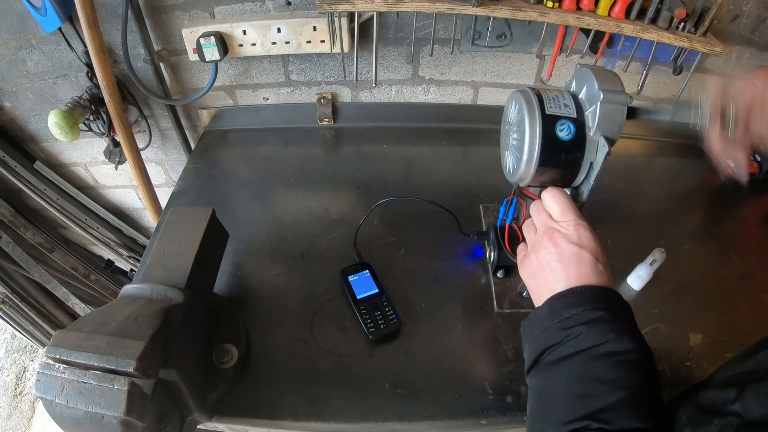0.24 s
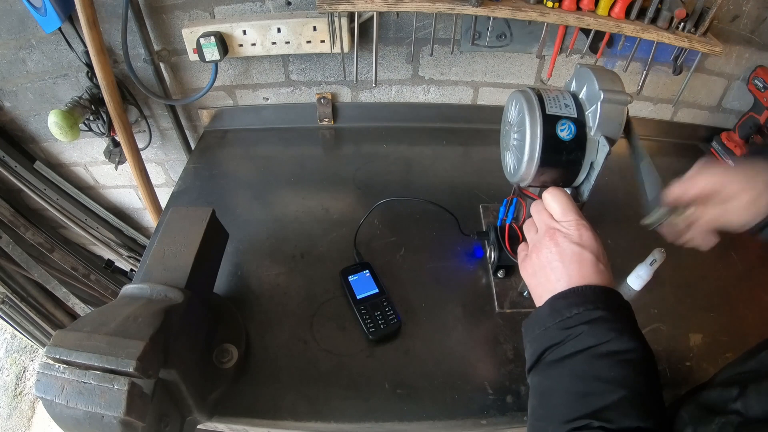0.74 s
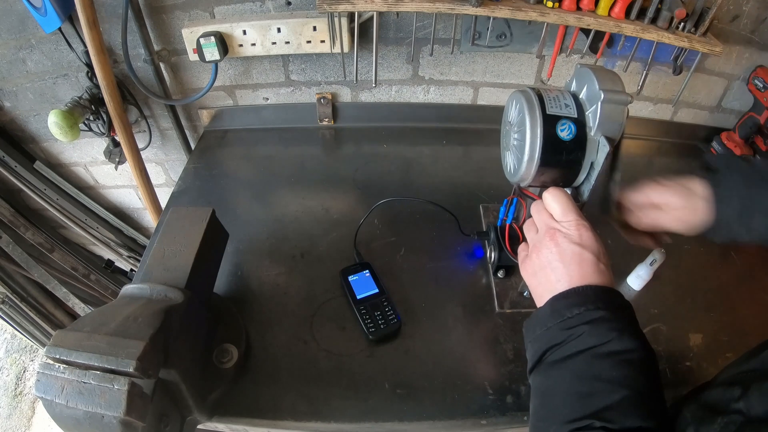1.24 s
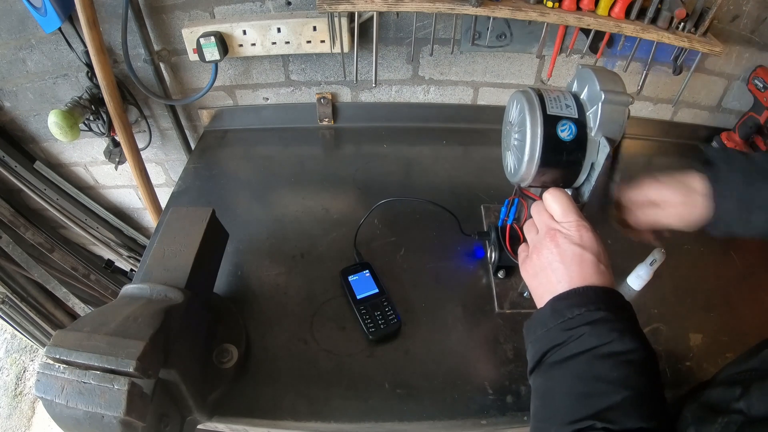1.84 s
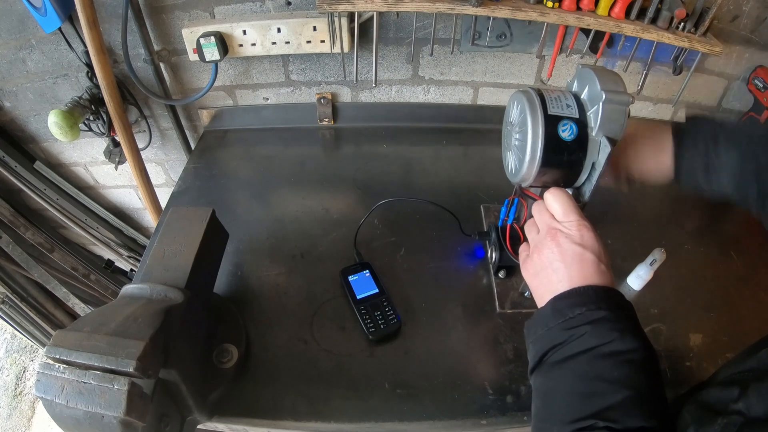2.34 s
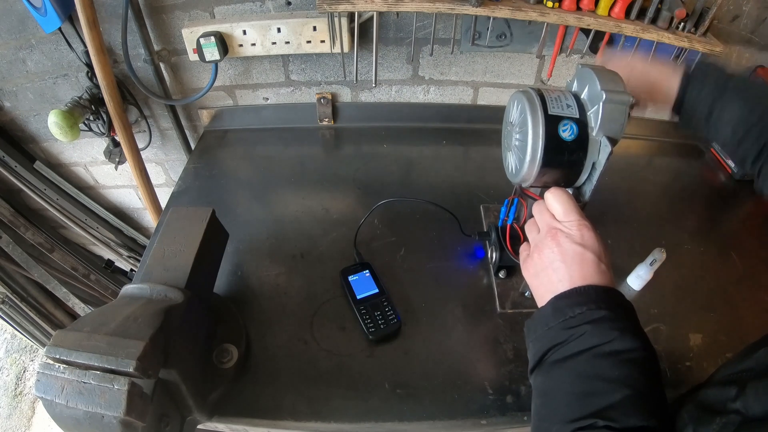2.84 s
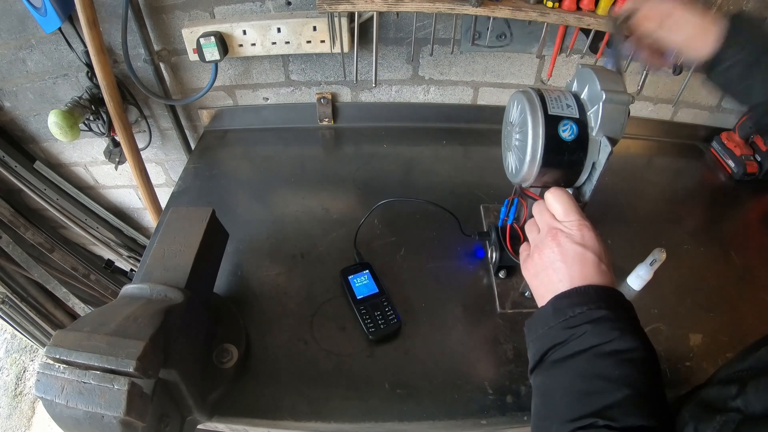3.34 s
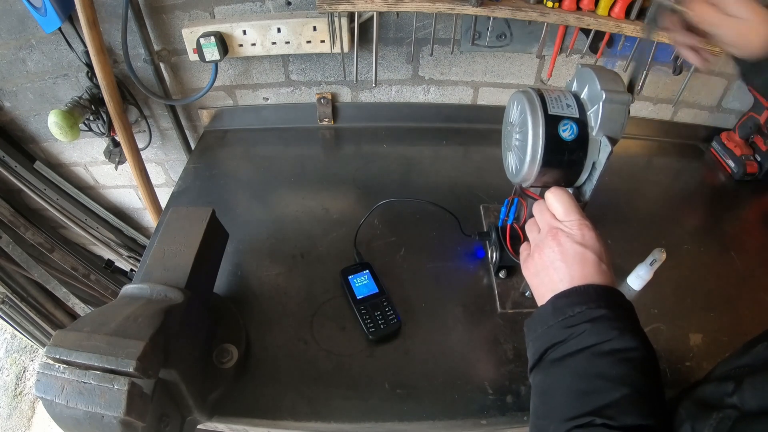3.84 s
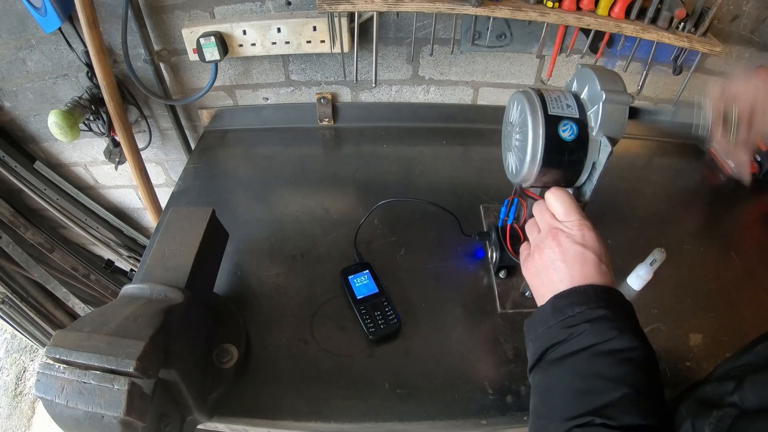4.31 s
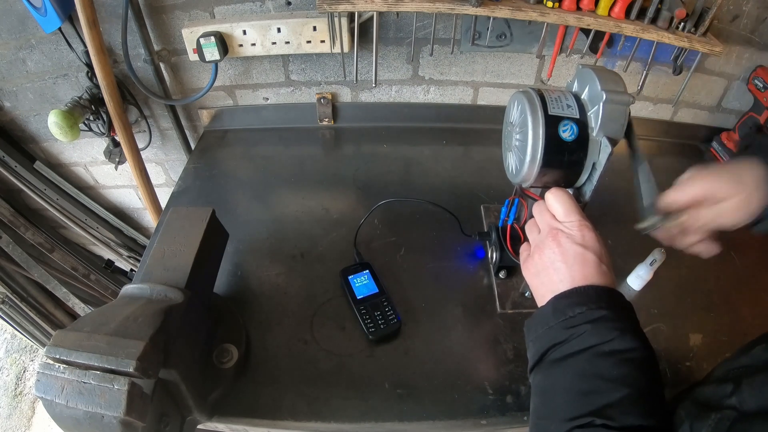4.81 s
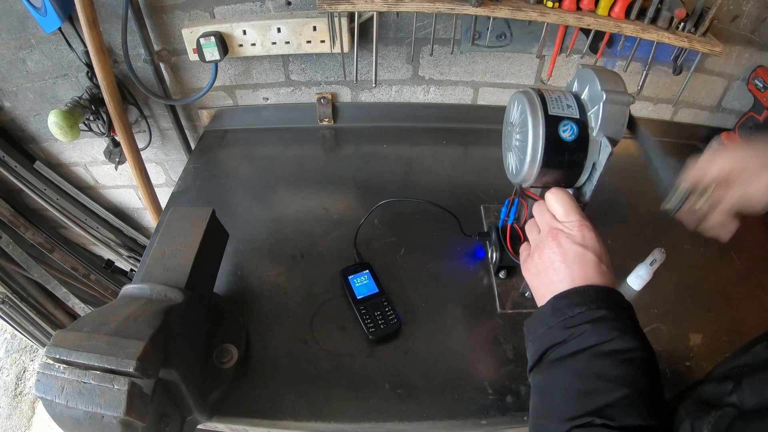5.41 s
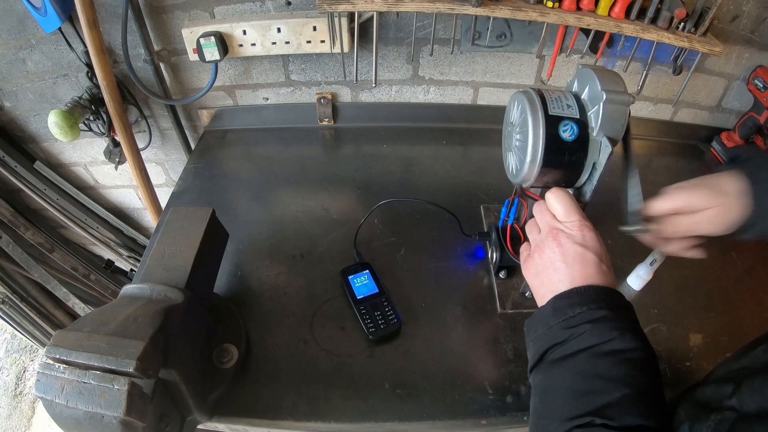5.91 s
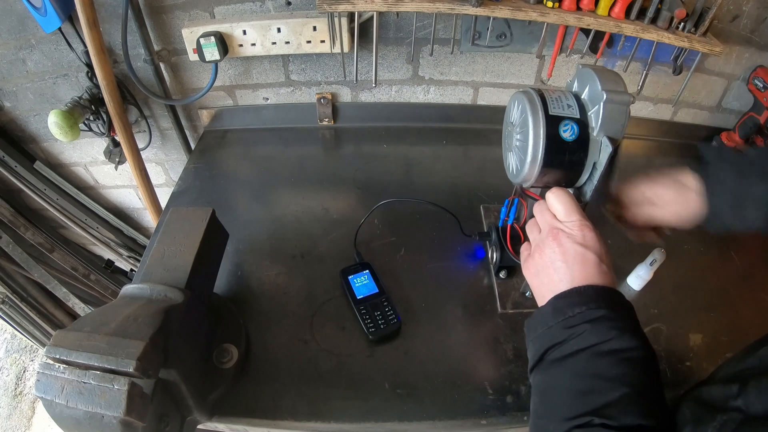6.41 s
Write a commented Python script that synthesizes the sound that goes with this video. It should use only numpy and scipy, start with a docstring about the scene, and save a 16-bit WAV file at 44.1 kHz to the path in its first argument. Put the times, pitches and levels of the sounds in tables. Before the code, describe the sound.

Close up in a small workshop, a geared electric motor is cranked by hand on a steel bench. A deep hum near 156 Hz throbs in uneven swells, about four a second, over gear rumble. A raspy whirr glides up with each push, roughly every 0.56 seconds, then sags. Soft brush hiss, fine crackle and small metallic ticks sit on top. The stereo is wide, the hum leaning left.

```python
"""A deep throbbing hum and a surging whirr: a geared electric motor is cranked by hand on a steel workbench.
Each push of the arm speeds the rotor up, and all the pitches rise with it. The springy mount hums as the
motor rocks, a slow wheel throbs, loaded teeth rumble and rasp, and rotor and gear tones glide through the
casing's resonances. The brushes hiss and crackle, with small ticks and a few brief scuffs on top."""
import sys
import numpy as np
from scipy import signal
from scipy.fft import rfft, irfft, next_fast_len
from scipy.io import wavfile
from scipy.ndimage import uniform_filter1d

SR = 44100
rng = np.random.default_rng(int(sys.argv[2]) if len(sys.argv) > 2 else 0)


def bounce(signal):
    """Save signal as a 16-bit WAV file at the path given by the first command-line argument."""
    frames = np.transpose(np.atleast_2d(signal))
    limited = np.clip(frames, -1, 1)
    pcm = np.round(limited * 32767).astype(np.int16)
    wavfile.write(sys.argv[1], SR, pcm)


N = 293467
T = np.arange(N) / SR  # time in seconds


def undb(db):
    """Turn decibels into a gain."""
    return 10 ** (np.asarray(db) / 20)


def unit(x):
    """Scale a sound to an average (rms) strength of 1."""
    return x / np.sqrt(np.mean(x ** 2))


def colour(x, points):
    """Filter a sound by an outline of (Hz, dB) points, falling 20 dB per octave outside it."""
    hz, db = np.transpose(points)
    size = next_fast_len(N + 8192)
    bins = np.maximum(np.arange(size // 2 + 1) * SR / size, 1)
    octaves_below = np.maximum(np.log2(hz[0] / bins), 0)
    octaves_above = np.maximum(np.log2(bins / hz[-1]), 0)
    outline_db = np.interp(np.log(bins), np.log(hz), db)
    gain = undb(outline_db - 20 * (octaves_below + octaves_above))
    return irfft(rfft(x, size) * gain, size)[..., :N]


def walk(rate):
    """Wander smoothly and at random with spread 1; rate is new random steps per second."""
    k = max(int(SR / rate), 2)
    steps = np.repeat(rng.standard_normal(N // k + 1), k)
    smooth = uniform_filter1d(uniform_filter1d(steps, k), k)
    return unit(smooth[:N])


def pan(x, side_db):
    """Place a sound by its left minus right level in dB."""
    return x * undb(np.array([[.5], [-.5]]) * side_db)


def stereo_noise(spread):
    """Make noise with a part shared by the ears and a part that differs between them."""
    mid, side = rng.standard_normal((2, N))
    return unit(mid + spread * side * np.array([[1], [-1]]))


def reflect(x, t60, wet_db):
    """Add a dense cloud of reflections for each ear, dying by 60 dB in t60 seconds."""
    t = T[:SR // 2]
    fade = undb(-60 * t / t60) * (t > .001)
    tail = rng.standard_normal((2, len(t))) * fade
    tail /= np.sqrt(np.sum(tail ** 2, axis=1, keepdims=True))
    reflections = signal.fftconvolve(np.atleast_2d(x), tail, axes=1)[:, :N]
    return x + undb(wet_db) * reflections


def angle(hz):
    """Add up the turning rate into the angle turned, in radians."""
    return 2 * np.pi * np.cumsum(hz) / SR


def ports(phase, lead):
    """Make a stereo tone whose left wave runs ahead by lead radians (behind if negative)."""
    return np.sqrt(2) * np.sin(phase + lead * np.array([[.5], [-.5]]))


def each_turn(turn, at, width):
    """Rise from 0 to 1 and back at the same place in every turn of the crank."""
    return np.exp(-(((turn - at + .5) % 1 - .5) / width) ** 2)


# Turns of the crank. Each row: start of the push in seconds, rotor rate then in Hz, length of the push
# in seconds, rotor rate reached in Hz, level in dB of the rotor's second harmonic before it fades in coasting.
TURNS = [(-0.3, 137, 0.27, 158.8, -53), (0.3, 142.5, 0.27, 156.4, -54), (0.872, 144.2, 0.24, 158.2, -51),
         (1.521, 136.3, 0.27, 155.9, -53), (2.071, 144.5, 0.22, 162.8, -53.5),
         (2.65, 143.3, 0.21, 162.7, -50.5), (3.28, 144, 0.18, 162.3, -57), (3.82, 143.3, 0.2, 164.6, -50.5),
         (4.38, 138.3, 0.28, 155.9, -57.5), (5.0, 145.3, 0.21, 167.4, -51.5),
         (5.56, 146.5, 0.21, 167.4, -54.5), (6.12, 150, 0.19, 167.4, -57.5),
         (6.69, 143.2, 0.14, 161.3, -52)]


def crank():
    """Rotor rate and crank position in turns: each push speeds the rotor up, then the load slows it."""
    start, slow_hz, push_s, fast_hz, _ = np.transpose(TURNS)
    corner_times = np.column_stack([start, start + push_s]).ravel()
    corner_hz = np.column_stack([slow_hz, fast_hz]).ravel()
    corner_numbers = np.arange(len(corner_times))
    stroke = np.interp(T, corner_times, corner_numbers)
    part = stroke % 1
    eased = np.floor(stroke) + .5 * (part + np.sin(np.pi * part / 2) ** 2)  # rounds the corners
    speed = np.interp(eased, corner_numbers, corner_hz)
    turn = np.interp(T, start, np.arange(len(start)))
    return uniform_filter1d(speed, SR // 50), turn


# The motor rocks on its mount about twice a turn. Each row: middle in seconds, half length in seconds,
# level of the hum in dB, left minus right in dB at the middle.
ROCKS = [(-0.02, 0.057, -35.5, 3), (0.192, 0.095, -34, -11.5), (0.546, 0.097, -33.5, -5),
         (0.79, 0.095, -34.5, -14), (1.097, 0.12, -35, -4.5), (1.376, 0.098, -44.5, -18.5),
         (1.777, 0.04, -35.5, -10), (1.975, 0.14, -33.5, -9), (2.255, 0.095, -35.5, -3.5),
         (2.562, 0.12, -32.5, -10), (2.822, 0.09, -34, 1), (3.136, 0.11, -30, -5.5),
         (3.426, 0.076, -36.5, -4), (3.707, 0.11, -29.5, -6.5), (3.985, 0.077, -37.5, -4.5),
         (4.267, 0.12, -40.5, -18), (4.642, 0.084, -37.5, -11), (4.878, 0.11, -33.5, -9.5),
         (5.135, 0.09, -39.0, -7.5), (5.432, 0.1, -29.5, -2.5), (5.63, 0.13, -37.5, -7.5),
         (5.999, 0.11, -32.0, -2), (6.192, 0.07, -34, -5), (6.557, 0.1, -30.5, -4.5)]
ROCK_SQUARENESS, ROCK_DRIFT_DB = 3.34, -2  # shape of a swell; change of left minus right per half length
HUM_REST_DB = -49  # hum between swells


def rocking():
    """Strength of the hum in each ear: every rock is a rounded swell that drifts to the right."""
    power = undb(HUM_REST_DB) ** 2
    for s, half_s, db, side_db in ROCKS:
        along = np.clip((T - s) / half_s, -4, 4)
        swell = undb(db) * np.exp(-np.abs(along) ** ROCK_SQUARENESS)
        power = power + pan(swell, side_db + ROCK_DRIFT_DB * along) ** 2
    return np.sqrt(power)


MOUNT_HZ = 156.1  # the mount's own resonance


def hum(speed, strength, follow, lag_s, waver_db, side_db):
    """The springy mount follows the rotor late, pulled towards its own resonance."""
    late_speed = np.interp(T - lag_s, T, speed)
    hz = MOUNT_HZ + follow * (late_speed - MOUNT_HZ)
    tone = ports(angle(hz) + .025 * walk(60), lead=-.4)
    return pan(tone, side_db + waver_db * walk(25)) * strength


# A slow wheel at a fifth of the rotor rate. Each row: harmonic, level in dB before the swells,
# share of the hum's swell, the coasting fade and the wander (0 to 1), change under a push in dB.
WHEEL = [(1, -67, .05, 0), (2, -59.5, 0.64, -2), (3, -64.5, 0.76, 3.5)]
WHEEL_COAST_DB = -12 - 4  # full fade while the crank coasts, scaled by each share


def wheel(shaft, rock, push, coast, apart_db):
    """A slow wheel throbs; its overtones swell when the mount rocks and fade while the crank coasts."""
    rock_db = uniform_filter1d(20 * np.log10(rock.mean(axis=0)), SR // 12)
    swell_db = rock_db - rock_db.mean() + WHEEL_COAST_DB * coast
    out = 0
    for k, db, share, push_db in WHEEL:
        tone = ports(k * shaft / 5 + .4 * walk(22), lead=-.7)
        tone = pan(tone, apart_db * walk(15))
        wander_db = 5.7 * walk(30)
        out = out + tone * undb(db + push_db * push + share * (swell_db + wander_db))
    return pan(out, side_db=-5)


# The teeth grind as the arm bears down. Each row: middle in seconds, half length in seconds, level in dB.
GRINDS = [(0.357, 0.25, -44), (1.06, 0.13, -42.5), (1.264, 0.11, -46), (1.67, 0.093, -41.5),
          (2.087, 0.092, -42.5), (2.775, 0.12, -39), (3.398, 0.094, -44.5), (3.91, 0.16, -41.5),
          (4.552, 0.1, -46), (5.152, 0.044, -41.5), (5.658, 0.13, -43.5), (6.21, 0.16, -45)]
RUMBLE_REST_DB = -48.5  # gears between the grinds


def grinding():
    """Strength of the gear rumble: a low bed and a swell for each grind."""
    swells = [undb(db) * np.exp(-((T - s) / half_s) ** 2) for s, half_s, db in GRINDS]
    return np.sqrt(undb(RUMBLE_REST_DB) ** 2 + np.sum(np.square(swells), axis=0))


# Colour of the gear rumble. Each row: pitch in Hz, relative strength in dB per Hz.
RUMBLE = [(20, -9), (45, -8), (65, -6.5), (115, -7), (160, 10.5), (215, -4.5), (270, -3), (380, -13),
          (520, -17.5), (750, -22.5), (1500, -49)]


def rumble(shaft, load, octave_db):
    """Loaded teeth knock unevenly over the second harmonic of the rotor, which a broad resonance lifts."""
    uneven_noise = stereo_noise(spread=0.92) * undb(3.3 * walk(60))
    knocks = unit(colour(uneven_noise, RUMBLE))
    octave = ports(2 * shaft + .45 * walk(40), lead=-1) * undb(3 * walk(25))
    octave = unit(colour(octave, [(278, -4.5), (293, 0), (312, 0), (330, -10.5)]))
    return pan(load * knocks + undb(octave_db) * octave, side_db=-2.5)


# Resonances of the casing. Each row: pitch in Hz, width in Hz, gain in dB.
CASING = [(441.6, 8.3, 6), (520.4, 14.6, 7), (625, 9.3, 3), (1096, 5.1, 3.5), (1147, 33, 0), (1194, 8, -8),
          (1249, 6.6, 8.5), (1325.4, 17, 6), (1385, 47, 6.5), (1620, 32, 2.5), (1852, 57, -2)]


def casing(x):
    """The shell passes every tone a little softened and rings when one glides over a resonance."""
    out = undb(-4) * x
    for hz, width, db in CASING:
        b, a = signal.iirpeak(hz, hz / width, fs=SR)
        out = out + undb(db) * signal.lfilter(b, a, x)
    return out


# Tones of rotor and gear meshes. Each row: multiple of the rotor rate, relative level in dB,
# change under a push in dB, change while slack in dB.
TONES = [(3, -14.5, 0, -7), (3.55, -11.5, -1, -8.5), (4, -26, -1.5, -18), (7, -18.5, -0.5, -7),
         (7.1, -23.5, -2.5, -5), (8, -15, 0.5, -7.5), (9, -13, 0, -1), (10, -19.5, -1, 0),
         (10.65, -13.5, 0, 2), (11, -18, 1, -7), (12, -15, 2.5, -4), (13, -21.5, -0.5, 4.5)]


def whine(shaft, push, slack, play, low_lead, low_side_db, lead, side_db):
    """Rotor and mesh tones flutter; the play in the gears shakes them most while the arm pushes."""
    shaky = shaft + play * undb(0.86 * push) * walk(50)
    stack = 0
    for multiple, db, push_db, slack_db in TONES:
        low = multiple < 5
        phase = multiple * shaky + rng.uniform(0, 2 * np.pi)
        tone = pan(ports(phase, low_lead if low else lead), low_side_db if low else side_db)
        flutter = 1 + .38 * walk(50) + .22 * np.array([walk(90), walk(90)])  # partly apart in each ear
        stack = stack + tone * flutter * undb(db + push_db * push + slack_db * slack)
    return reflect(casing(stack), t60=.14, wet_db=-8)


def rubbing(shaft, outline, pulse_db, grain_db, spread):
    """Sliding contact: gritty friction whose pressure rises and falls once each revolution of the rotor."""
    pressure = undb(pulse_db * np.cos(shaft) + grain_db * walk(900) + 0.56 * walk(30))
    return unit(colour(stereo_noise(spread) * pressure, outline))


# Colour of the tooth rasp. Each row: pitch in Hz, relative strength in dB per Hz.
RASP = [(500, -7), (950, -3.5), (1120, -23), (1380, 6.5), (1900, -3), (2300, -6.5), (4000, -34.5)]


def rasp(shaft):
    """Loaded teeth rub with a coarse, wide rasp."""
    return undb(-8.0) * rubbing(shaft, RASP, pulse_db=-0.5, grain_db=3.5, spread=1.0)


# Colour of the teeth scraping under a push. Each row: pitch in Hz, relative strength in dB per Hz.
SCRAPE = [(1500, 6), (2000, 7), (2600, -3), (3050, 7), (3700, -6), (5000, -16.5)]


def scrape(shaft, push):
    """The teeth scrape harder the more the arm speeds the rotor up."""
    grit = rubbing(shaft, SCRAPE, pulse_db=-2.0, grain_db=3.0, spread=0.23)
    return grit * undb(-70.5) * np.maximum(push + 1.45, 0)


# Colour of the brush hiss. Each row: pitch in Hz, relative strength in dB per Hz.
BRUSH = [(1200, 5), (2500, -3.5), (3050, -0.5), (3700, -4), (4400, -1.5), (5000, -7), (6100, 3), (7700, -1),
         (8600, -11.5), (10500, -13.5), (13000, -19.5), (15500, -32)]


def brushes(shaft, hiss_db, crackle_db, per_second):
    """Carbon on the commutator: an even hiss with a fine crackle, ringing faintly in the end cap."""
    hiss = rubbing(shaft, BRUSH, pulse_db=-0.5, grain_db=1.53, spread=0.71) * undb(0.61 * walk(22))
    spark_db = np.minimum(4 * rng.exponential(size=N), 10)
    sparks = (rng.random((2, N)) < per_second / SR) * undb(spark_db)
    crackle_colour = [(2500, -15.0), (5000, 4.0), (6300, 2), (7700, 16.5), (9000, -14.0),
                      (13000, -4.5), (15500, -23.5)]
    crackle = unit(colour(sparks * undb(2 * walk(20)), crackle_colour))
    return reflect(undb(hiss_db) * hiss + undb(crackle_db) * crackle, t60=.05, wet_db=-7)


# Ticks of the crank and gears. Each row: start in seconds, peak in dB before the final 4 dB lift
# and the reflections, pitch of the ring in Hz.
TICKS = [(0.0283, -48.5, 6700), (0.755, -46, 6840), (1.1631, -49, 7295), (1.3234, -53, 6300),
         (1.5683, -53.5, 6700), (1.6531, -51, 6040), (1.8346, -50, 6500), (2.141, -51.5, 7260),
         (3.424, -49, 6530), (4.808, -50.5, 6200), (5.9554, -43.5, 7680), (6.5555, -54, 6090)]


def ticks(ring_s, width_hz, snap_db):
    """Small metal contacts: a bright snap and a short ring."""
    out, t = np.zeros(N), T[:SR // 30]
    for s, db, hz in TICKS:
        edges = [max(hz - width_hz / 2, 500), min(hz + width_hz / 2, .45 * SR)]
        band = signal.butter(1, edges, "band", fs=SR, output="sos")
        contact = rng.standard_normal(len(t)) * np.exp(-t / ring_s)
        ring = signal.sosfilt(band, signal.sosfilt(band, contact))
        tick = ring + undb(snap_db) * contact
        i = int(s * SR)
        out[i:i + len(t)] += (undb(db) * tick / np.abs(tick).max())[:N - i]
    return undb(4) * reflect(out, t60=.06, wet_db=-1)


# Brief bright scuffs. Each row: middle in seconds, level in dB before widening, half length in seconds.
SCUFFS = [(0.513, -60, 0.0089), (.92, -64, 0.055), (1.093, -57, 0.029), (1.35, -59, 0.018),
          (4.601, -61, 0.009)]


def scuffs():
    """Short gritty rubs: bright noise that swells and dies around each moment."""
    swell = sum(undb(db) * np.exp(-np.abs(T - s) / half_s) for s, db, half_s in SCUFFS)
    grit = stereo_noise(spread=0.66) * undb(2.3 * walk(1200))
    return swell * unit(colour(grit, [(3000, 13), (8000, 13), (14000, 1)]))


# How much the treble differs between the ears. Each row: pitch in Hz, lift of side over mid in dB.
WIDTH = [(20, 14), (5500, -4), (8000, 3), (11000, 2.5), (20000, -2)]


def widen(x, points):
    """Tilt the side of a stereo sound (left minus right) against its mid (left plus right), by frequency."""
    mid = colour((x[0] + x[1]) / 2, [(hz, -db / 2) for hz, db in points])
    side = colour((x[0] - x[1]) / 2, [(hz, db / 2) for hz, db in points])
    return np.array([mid + side, mid - side])


# Places in the turn (0-1, where whole numbers are push starts) and half widths in turns.
SLACK_AT, SLACK_WIDTH = 1, 0.057  # the drive goes slack around the start of each push
COAST_AT, COAST_WIDTH = 0.679, 0.094  # the crank coasts
OCTAVE_COAST_DB = -12  # fade of the rotor's second harmonic in coasting
# The whine is weakest around the slack and grows under a push.
WHINE_DB, WHINE_PUSH_DB, WHINE_SAG_DB, WHINE_SAG_WIDTH = -49.5, 0.62, -3, 0.28


def scene():
    """The crank speed sets the gliding pitches; each push of the arm roughens and brightens the whirr."""
    speed, turn = crank()
    shaft = angle(speed)
    push = np.minimum(unit(uniform_filter1d(np.gradient(speed), SR // 15)), 1.8)  # acceleration, relative
    slack = each_turn(turn, SLACK_AT, SLACK_WIDTH)
    coast = each_turn(turn, COAST_AT, COAST_WIDTH)
    rock = rocking()

    start, *_, turn_db = np.transpose(TURNS)
    octave_db = np.interp(T, start, turn_db) + OCTAVE_COAST_DB * coast
    body = hum(speed, rock, follow=.7, lag_s=0.037, waver_db=2, side_db=1)
    body = body + wheel(shaft, rock, push, coast, apart_db=2)
    body = body + rumble(shaft, grinding(), octave_db)

    sag = each_turn(turn, SLACK_AT, WHINE_SAG_WIDTH)
    whine_db = WHINE_DB + WHINE_PUSH_DB * push + WHINE_SAG_DB * sag
    tones = whine(shaft, push, slack, play=0.031, low_lead=1.4, low_side_db=-7.0, lead=1.19, side_db=-2.0)
    whirr = (tones + rasp(shaft)) * undb(whine_db) + scrape(shaft, push)

    treble = brushes(shaft, hiss_db=-60.0, crackle_db=-69.5, per_second=55)
    treble = treble + ticks(ring_s=0.0026, width_hz=2300, snap_db=-23)
    return body + whirr + widen(treble + scuffs(), WIDTH)


def record(dry):
    """A steep low-pass filter removes the treble above 15200 Hz."""
    return signal.sosfilt(signal.ellip(8, .2, 70, 15200, fs=SR, output="sos"), dry)


dry = scene()
out = record(dry)
bounce(out)
```